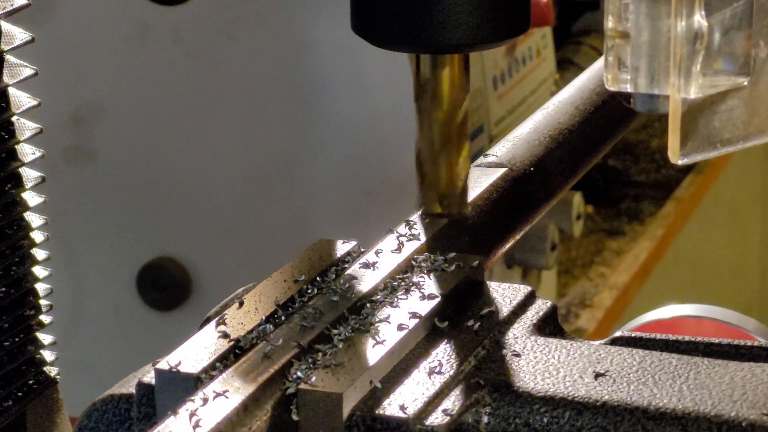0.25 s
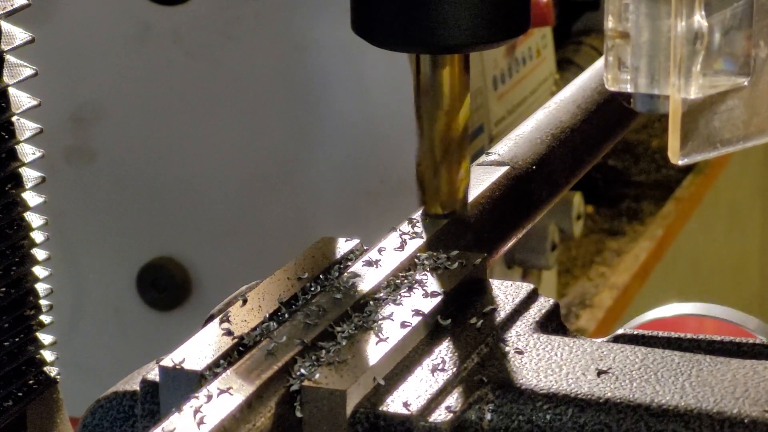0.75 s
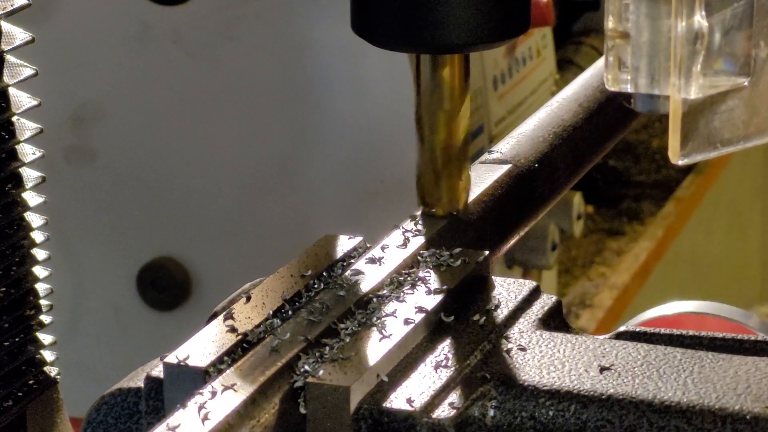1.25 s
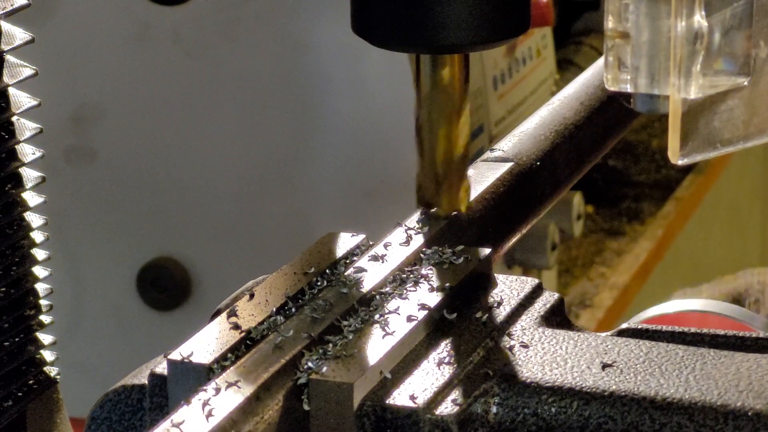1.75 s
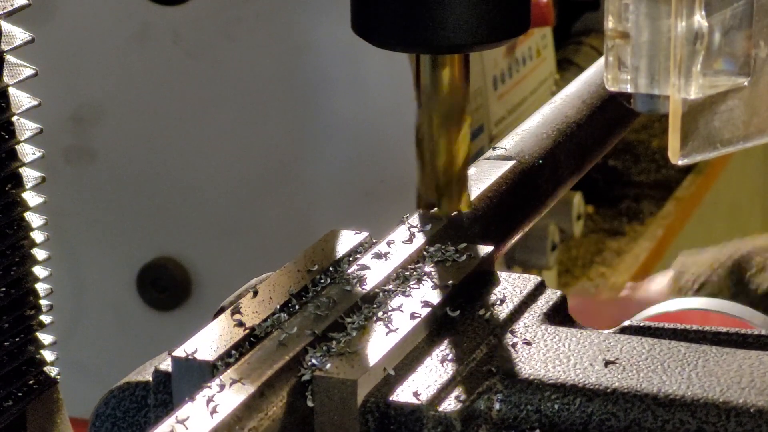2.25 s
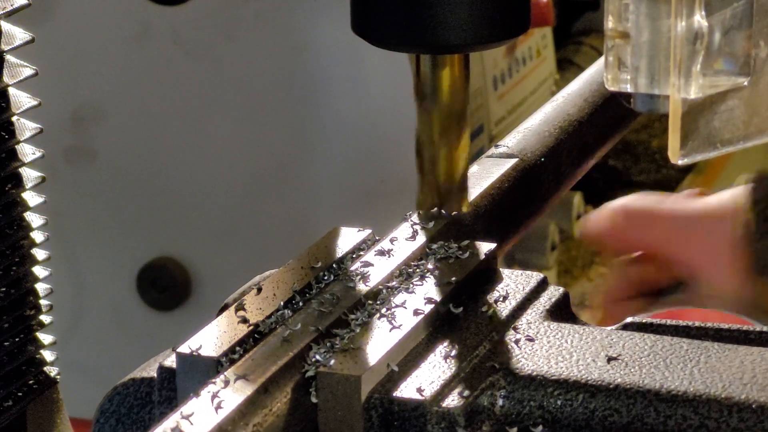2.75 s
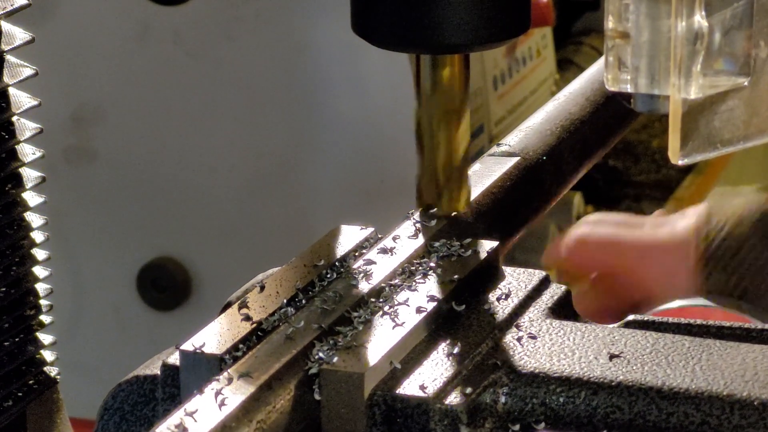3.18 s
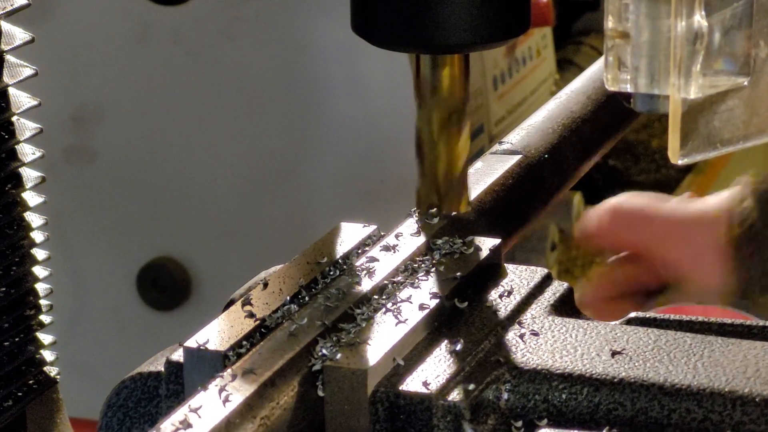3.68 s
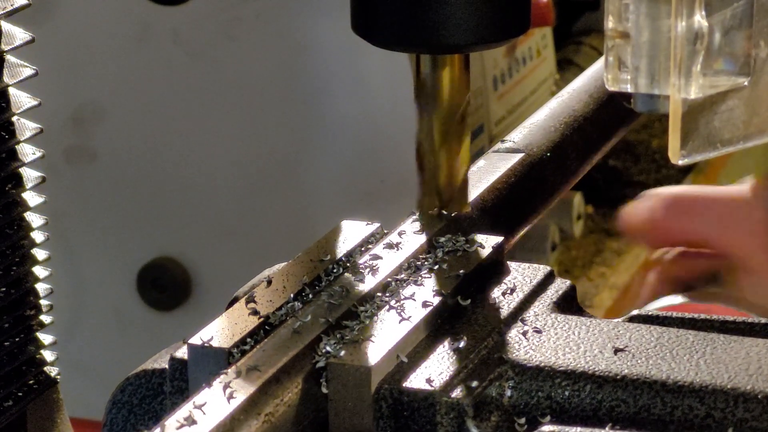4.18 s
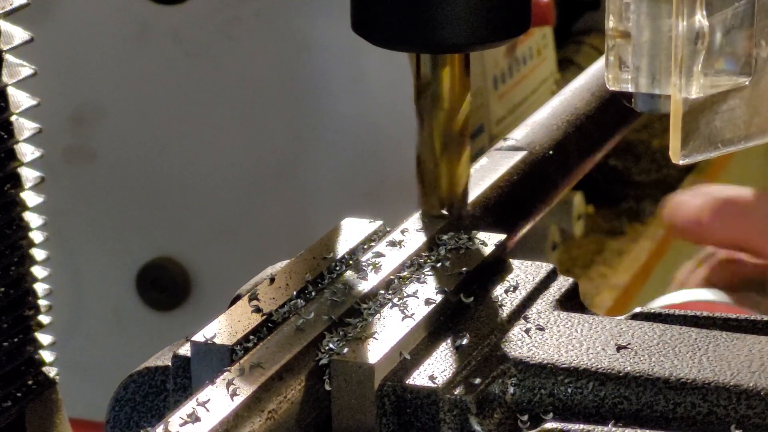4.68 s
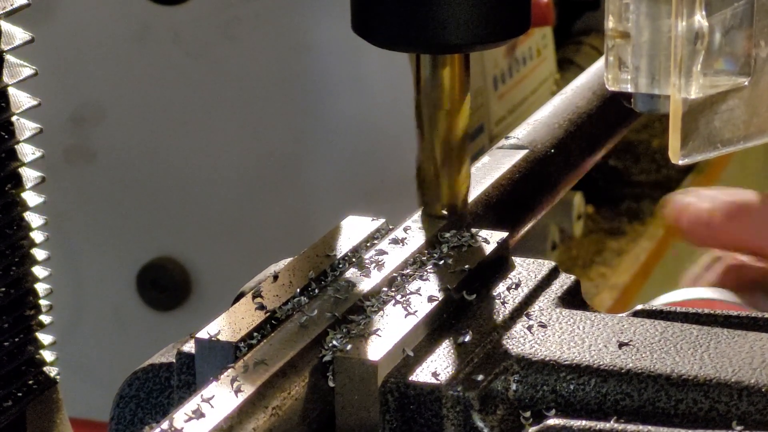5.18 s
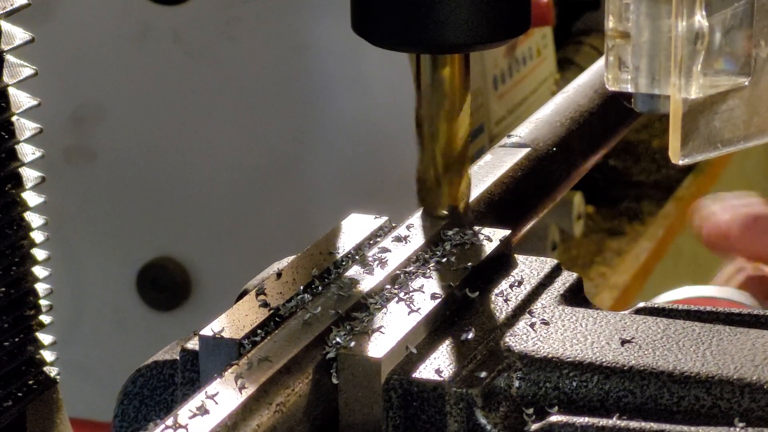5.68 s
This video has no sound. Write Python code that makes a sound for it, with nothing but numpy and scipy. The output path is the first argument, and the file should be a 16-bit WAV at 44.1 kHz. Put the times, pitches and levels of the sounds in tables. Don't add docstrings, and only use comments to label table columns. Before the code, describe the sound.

Milling machine hums and growls evenly while short irregular crackles, bright chirps and thin whistles snap off a steel bar close by.

```python
import sys
import numpy as np
from scipy import signal
from scipy.fft import rfft, irfft
from scipy.io import wavfile
from scipy.ndimage import uniform_filter1d

SR = 44100
rng = np.random.default_rng(int(sys.argv[2]) if len(sys.argv) > 2 else 0)


def master_out(mix):
    frames = np.transpose(np.atleast_2d(mix))
    ceiling = np.clip(frames, -1, 1)
    pcm = np.round(ceiling * 32767).astype(np.int16)
    wavfile.write(sys.argv[1], SR, pcm)


def volts_from_db(level):
    exponent = np.asarray(level, float) / 20
    return 10 ** exponent


N = 261513

# start in seconds, length in seconds, starting pitch in Hz,
# level in dB, left minus right in dB.
SQUEALS = [(0.29, 0.017, 4320, -17, 1), (0.307, 0.012, 4270, -18.5, 10), (0.325, 0.013, 4203, -11.5, -1),
           (0.789, 0.011, 4330, -11, -8), (0.801, 0.014, 4380, -13, 0), (0.812, 0.02, 4420, -13, 10),
           (0.836, 0.014, 4320, -21, -3), (0.861, 0.017, 4200, -10, 6), (1.236, 0.0098, 4520, -26, -1),
           (0.981, 0.0051, 4160, -18, 1), (1.246, 0.023, 4360, -12, -8), (1.271, 0.015, 4420, -13.5, 9),
           (1.675, 0.038, 4330, -14, -10), (1.716, 0.0085, 4370, -9, -4), (1.732, 0.0087, 4360, -11, 0),
           (1.748, 0.01, 4300, -20.5, 3), (2.025, 0.015, 3730, -26.5, 4), (2.038, 0.037, 4120, -32.5, -1),
           (2.233, 0.01, 3960, -16, 15), (2.352, 0.026, 4100, -28, 7), (2.455, 0.016, 3834, -20.5, 9),
           (3.024, 0.023, 4270, -10, 5), (3.055, 0.017, 4278, -14, -1), (3.07, 0.01, 4320, -11, 0),
           (3.087, 0.024, 4276, -15, 5), (3.472, 0.018, 4280, -23, 10), (3.355, 0.042, 4070, -31, -6),
           (3.504, 0.055, 4320, -13.5, -6), (3.941, 0.02, 4220, -17.5, 4), (4.403, 0.014, 4260, -9.5, 2.5),
           (4.5, 0.039, 3900, -30.5, 22), (4.55, 0.035, 4280, -23.5, -2), (4.75, 0.0086, 4090, -22, 0),
           (4.886, 0.011, 4213, -7, 4), (5.259, 0.013, 4080, -26.5, 4), (5.356, 0.01, 4240, -12, 3),
           (5.38, 0.022, 4260, -20, 12), (5.407, 0.045, 4380, -15, 4), (5.853, 0.036, 4216, -14, 6),
           (5.903, 0.03, 4370, -17.5, 2)]
# start in seconds, length in seconds, pitch in Hz, level in dB.
SQUEAKS = [(0.124, 0.018, 4760, -17.5), (0.327, 0.015, 3320, -25), (0.544, 0.03, 4030, -37),
           (0.628, 0.016, 5000, -24), (0.297, 0.02, 7650, -29), (0.3, 0.028, 5100, -33),
           (0.834, 0.022, 4150, -42), (0.86, 0.026, 3300, -25), (1.026, 0.016, 4046, -29.5),
           (1.489, 0.014, 4120, -27.5), (1.336, 0.0065, 3340, -38), (1.668, 0.0044, 4320, -24),
           (0.826, 0.024, 3510, -32), (2.024, 0.018, 5520, -22), (2.055, 0.025, 5710, -23),
           (2.227, 0.0087, 6220, -24.5), (2.38, 0.004, 4940, -22.5), (2.463, 0.0067, 5570, -13.5),
           (2.659, 0.007, 4020, -22.5), (2.663, 0.013, 3220, -23), (3.025, 0.039, 5320, -36),
           (3.096, 0.014, 3310, -26.5), (3.867, 0.0081, 5450, -28), (4.242, 0.016, 5000, -29),
           (4.256, 0.014, 5150, -32), (4.51, 0.032, 5600, -41), (4.507, 0.022, 3010, -26),
           (4.62, 0.0089, 5580, -22), (4.433, 0.0083, 4330, -24), (4.571, 0.005, 4300, -18),
           (4.895, 0.007, 4258, -16.5), (1.295, 0.017, 4370, -28), (3.959, 0.018, 4310, -28.5),
           (2.678, 0.034, 3210, -40), (5.245, 0.014, 4190, -35.5), (4.743, 0.011, 5010, -16.5),
           (4.888, 0.0089, 5050, -39), (5.231, 0.012, 5080, -29), (4.93, 0.05, 6340, -42),
           (5.753, 0.007, 3900, -38), (5.251, 0.011, 5070, -22), (3.566, 0.03, 4280, -27),
           (5.462, 0.02, 4310, -27), (5.755, 0.034, 5500, -28)]
# start in seconds, peak level in dB, pitch in Hz, length in seconds.
CHIRPS = [(0.045, -34, 4960, 0.01), (0.065, -39, 4000, 0.016), (0.38, -33, 5490, 0.03),
          (0.687, -36, 5780, 0.014), (0.885, -33, 5530, 0.02), (1.077, -34, 4970, 0.011),
          (1.089, -37, 5010, 0.012), (1.114, -29, 4870, 0.012), (0.141, -29, 4550, 0.017),
          (0.632, -33, 5300, 0.015), (0.083, -40, 5700, 0.006), (1.532, -38, 4930, 0.018),
          (0.113, -41, 7260, 0.008), (0.284, -30, 6250, 0.0079), (0.312, -21, 3830, 0.012),
          (0.768, -33, 5600, 0.015), (1.115, -41, 7230, 0.0071), (1.442, -41, 3030, 0.013),
          (1.497, -41, 6220, 0.01), (1.937, -42, 5010, 0.008), (2.6, -40, 4480, 0.021),
          (2.798, -39, 4940, 0.005), (2.9, -50, 6430, 0.006), (2.902, -43, 5000, 0.008),
          (2.92, -51, 5600, 0.014), (3.025, -31, 3350, 0.02), (3.358, -37, 5600, 0.02),
          (3.476, -33, 2350, 0.012), (3.478, -23, 4700, 0.01), (3.553, -27, 3310, 0.012),
          (3.55, -35, 3840, 0.012), (3.885, -39, 5500, 0.01), (4.269, -22, 5270, 0.01),
          (4.765, -26, 5590, 0.016), (5.365, -37, 2350, 0.02), (5.597, -40, 5800, 0.02),
          (5.862, -33, 6500, 0.03), (3.697, -45, 5840, 0.038), (4.1, -46, 5600, 0.012),
          (4.105, -32, 3120, 0.025), (3.852, -32, 3920, 0.037), (3.098, -22, 3900, 0.011),
          (4.662, -41, 4140, 0.024), (4.29, -29, 4150, 0.034), (4.313, -36, 4660, 0.006),
          (4.717, -23, 5020, 0.016), (5.595, -39, 2974, 0.027), (5.201, -27, 6320, 0.022),
          (4.284, -32, 5420, 0.02)]
# frequency in Hz, lead in radians.
PORT_LEAD = [(220, .1), (310, 1.1), (1120, 1.3), (1460, -.9), (2240, 1.5), (4050, .9), (4820, 2.7),
             (6290, 5.2), (7060, 7.0), (8800, 7.6), (12000, 7.1)]


def along_hz(table, hz):
    at, value = np.transpose(table)
    return np.interp(np.log(hz + 1), np.log(at + 1), value)


def level(x, db):
    return x * volts_from_db(db) / np.sqrt(np.mean(x ** 2))


def walk(rate, size=N):
    k = int(SR / rate)
    steps = np.repeat(rng.standard_normal(size // k + 1), k)
    return 1.25 * uniform_filter1d(uniform_filter1d(steps, k), k)[:size]


def bump(hz, centre, width):
    return 1 / np.sqrt(1 + (2 * (hz - centre) / width) ** 2)


def swell(length, rise, fall):
    t = np.arange(int((length + 7 * fall) * SR)) / SR
    grow = np.sin(np.pi / 2 * np.clip(t / rise, 0, 1)) ** 2
    return grow * np.exp(-np.clip(t - length, 0, None) / fall)


def add(out, s, sound):
    i = max(int(s * SR), 0)
    out[..., i:i + sound.shape[-1]] += sound[..., :out.shape[-1] - i]


def two_ports(spectrum_gain, source):
    # frequency in Hz, share that left and right have in common (0 to 1).
    alike = [(30, 0.72), (190, 1), (350, 0.81), (700, 0.7), (1400, 0.31), (3000, 0.29), (16000, 0.72)]
    hz = np.fft.rfftfreq(source.shape[1], 1 / SR)
    share = np.clip(along_hz(alike, hz), 0, 1)
    common, left, right = rfft(source) * spectrum_gain
    shared = np.sqrt(share) * common
    left = shared * np.exp(1j * along_hz(PORT_LEAD, hz)) + np.sqrt(1 - share) * left
    right = shared + np.sqrt(1 - share) * right
    return irfft([left, right], source.shape[1])


def machine_head():
    # frequency in Hz, level in dB per Hz.
    growl = [(15, -68), (25, -62), (92, -37), (215, -18.5), (252, -19), (284, -7), (332, -2), (366, -1.5),
             (717, -17.5), (761, -24.5), (1150, -11.5), (2800, -23.5)]
    hiss = [(3100, -34), (3700, -31), (5000, -35.5), (7000, -43), (10000, -49), (12800, -45.5),
            (16000, -47)]
    # frequency in Hz, width in Hz, height above the noise in dB.
    casing = [(59.2, 4, 11.5), (140.3, 9.2, 14), (221.5, 31, 7.5), (311.4, 17, 2.5), (330.4, 20, 6),
              (393, 18, 3.5), (415.3, 58, 6.5), (624.3, 30, 12.5), (715, 28.5, 17), (830, 40, 14),
              (947, 16, 9), (1155, 46, 10.5), (1529, 40, 5), (1700, 48, 8), (11190, 50, 10)]
    # time in seconds, growl level in dB, bench rumble in dB.
    load = [
        (0.0, -33.5, -62),
        (0.06, -34.5, -51),
        (1.0, -35, -55.5),
        (2.0, -34.5, -54),
        (2.5, -33, -57),
        (3.29, -34, -58.5),
        (3.75, -34, -54),
        (5.0, -33, -60.5),
        (5.93, -34, -58),
    ]
    # frequency in Hz, level in dB.
    hum_tones = [(100, -57.5), (300, -47.5), (618, -58), (1162, -57)]
    t, hz = np.arange(N) / SR, np.fft.rfftfreq(N, 1 / SR)
    s, load_db, rumble_db = np.transpose(load)
    peaks = sum((volts_from_db(db) - 1) * bump(hz, f, w) ** 2 for f, w, db in casing)
    gain = volts_from_db(along_hz(growl + hiss, hz)) * (1 + peaks)
    low = 1 / (1 + (hz / 90) ** 8)
    pulse = (1 + 0.18 * np.sin(2 * np.pi * hum_tones[0][0] * t)) * volts_from_db(0.9 * walk(12))
    mesh = two_ports(gain * (1 - low), pulse * rng.standard_normal((3, N)))
    rumble = two_ports(gain * low * np.clip(hz / 45, 0, 1) ** 2, rng.standard_normal((3, N)))
    hum = sum(volts_from_db(db + 5.6 + 1.7 * walk(4.2)) * np.sin(2 * np.pi * f * t) for f, db in hum_tones)
    mesh = volts_from_db(np.array([[1.1], [-1.1]])) * level(mesh, 2.31) * volts_from_db(np.interp(t, s, load_db))
    return mesh + level(rumble, 0) * volts_from_db(np.interp(t, s, rumble_db)) + hum


def slip_rate(s):
    tones = [(row[0], row[2]) for row in SQUEALS + SQUEAKS + CHIRPS if row[2] > 3700]
    return min(tones, key=lambda row: abs(row[0] - s))[1]


def causal(gain):
    cepstrum = irfft(np.log(gain + 1e-4))
    half = len(cepstrum) // 2
    cepstrum = np.concatenate([cepstrum[:1], 2 * cepstrum[1:half], np.zeros(half)])
    return np.exp(rfft(cepstrum))


def chip_ring(hz, slip_hz, bright_hz, low_db, chance):
    # frequency in Hz, width in Hz, level in dB.
    steel = [(3410, 180, -19), (4280, 35, 4), (5310, 3500, -12.5), (5600, 140, -21), (6930, 570, -27),
             (8640, 690, -22), (9400, 600, -9.5), (11220, 290, 3), (12400, 570, -6), (13200, 270, -11),
             (14300, 590, -10.5), (15200, 590, -4.5)]
    ring = sum(volts_from_db(db + 3 * a) * bump(hz, f * (1 + 0.006 * b), w) ** 2
               for (f, w, db), (a, b) in zip(steel, chance))
    ring = ring + volts_from_db(-26)
    ring = ring + volts_from_db(1.5) * bump(hz, slip_hz, 300) ** 2 + volts_from_db(3) * bump(hz, bright_hz, 450) ** 2
    ring = ring + sum(volts_from_db(-2) * bump(hz, k * slip_hz, 350) ** 2 for k in (2, 3))
    patches_db = 4.5 * walk(SR / 22, size=len(hz))
    scrape_db = low_db / (1 + (hz / 3900) ** 12)
    return ring * volts_from_db(patches_db + scrape_db) / np.sqrt(1 + (2500 / (hz + 1)) ** 6)


def tearing_chips():
    # start in seconds, length in seconds, level in dB, treble over middle in dB,
    # low scrape over middle in dB.
    bites = [(0.289, 0.043, -28, 2.5, -3), (0.33, 0.004, -28.5, -1, -6), (0.748, 0.02, -32, 0, 8),
             (0.768, 0.034, -25, 5, 5), (0.823, 0.024, -23.5, 0, 5), (1.25, 0.014, -30, 2, -10),
             (1.669, 0.059, -32, -2, -8), (1.703, 0.016, -28.5, 0, -4), (2.017, 0.046, -37.5, -5, -4),
             (2.23, 0.01, -41, 7, -2), (2.344, 0.037, -38.5, -9, -3), (2.369, 0.0056, -35.5, 0, -3),
             (2.434, 0.042, -31.5, -3, -7), (2.66, 0.012, -27.5, -3.5, 7), (3.019, 0.024, -32, 0, -5),
             (3.044, 0.034, -26.5, 9, -7), (3.088, 0.015, -35, -4, 0), (3.356, 0.014, -34, 0.5, -3),
             (3.372, 0.011, -33.5, -3, -3), (3.469, 0.036, -25.5, -3, -3), (3.549, 0.0068, -28, -6, -1),
             (3.842, 0.036, -33, -5.5, -4), (3.944, 0.013, -38, -4, -6), (4.1, 0.01, -31, -1, 1),
             (4.308, 0.0032, -30.5, -3, -15), (4.403, 0.016, -28.5, -2, -4), (4.509, 0.02, -27.5, -2, 4),
             (4.533, 0.024, -26, -8, 0), (4.742, 0.017, -30, -4, -7), (4.883, 0.018, -28, 3, -7),
             (5.236, 0.03, -30, -6, -5), (5.356, 0.038, -22.5, -8.5, -2), (5.408, 0.026, -25.5, 0, -5),
             (5.85, 0.08, -36.5, 2, -8)]
    # start in seconds, level in dB, treble over middle in dB,
    # brightest treble in Hz.
    grazes = [(0.044, -41, -12, 10500), (0.081, -44.5, -6, 12100), (0.12, -37, -15, 9400),
              (0.276, -49, -1, 12800), (0.624, -39.5, -5, 14800), (1.028, -47, -12, 7940),
              (1.107, -43, -15, 12300), (1.233, -46, -9, 13200), (1.484, -43.5, -14, 12800),
              (1.527, -40, -13, 12600), (4.714, -41, -3, 11200), (2.772, -45.5, -18, 12500),
              (2.796, -50, -12, 10500), (2.897, -53, -6, 10940), (0.55, -46, -7, 12600),
              (4.262, -43, 0, 14900), (4.663, -36, -9, 12100), (5.195, -49, -17, 12500),
              (5.597, -41, 1, 13900), (5.754, -38, 2, 12400)]
    chips = [(*bite, 12500) for bite in bites]
    chips += [(s, 0.0087, db, treble_db, -2, bright_hz) for s, db, treble_db, bright_hz in grazes]
    chances = rng.standard_normal((len(chips), 12, 2))
    size = 8192
    hz = np.fft.rfftfreq(size, 1 / SR)
    treble = 1 / (1 + (6800 / (hz + 1)) ** 10)
    out = np.zeros((2, N))
    for (s, length, db, treble_db, low_db, bright_hz), chance in zip(chips, chances):
        ring = chip_ring(hz, slip_rate(s), bright_hz, low_db, chance)
        middle, high = (causal(g) / np.sqrt(np.mean(g ** 2)) for g in (ring * (1 - treble), ring * treble))
        sound = 0
        for gain, share_db in ((middle, treble_db), (high, -treble_db)):
            drive = np.zeros(size)
            shape = swell(length + 0.0041, min(0.011, 0.56 * length), 0.013)
            add(drive, 0.005, volts_from_db(db + 1.5) * shape)
            slips = rng.standard_normal((3, size)) * volts_from_db(2.7 * walk(217, size=size))
            sound = sound + two_ports(gain / np.sqrt(1 + volts_from_db(2 * share_db)), slips * drive)
        add(out, s - 0.008, sound)
    return out * volts_from_db(np.array([[1.2], [-1.2]]))


def chatter(rows, trim_db, overtones_db, fall, wobble_db):
    locking_hz = [4300, 5060, 5720, 6500, 8640, 11170, 13300]
    out = np.zeros((2, N))
    wobble, waver, flutter = walk(110), walk(100), walk(900)
    for s, length, start_hz, end_hz, db, pan_db in rows:
        shape = swell(length + 0.0009, 0.01, fall)
        t = np.arange(len(shape)) / SR
        i = np.clip(int(s * SR) + np.arange(len(shape)), 0, N - 1)
        loose = np.clip(np.min(np.abs(end_hz / np.array(locking_hz) - 1)) / 0.1, 0.1, 1)
        hz = start_hz + (end_hz - start_hz) * np.clip(2 * t / length - 0.5, -0.5, 1.5)
        hz = hz * (1 + 0.0031 * waver[i]) - 40 * np.exp(-t / 0.0058)
        phase = 2 * np.pi * np.cumsum(hz + 150 * loose * flutter[i]) / SR
        shape = shape * volts_from_db(wobble_db * wobble[i] - 0.69 * loose)
        pan = volts_from_db(np.array([[pan_db], [-pan_db]]) / 2)
        heard_db = overtones_db if end_hz > 3900 else overtones_db[:1]
        for k, over_db in enumerate(heard_db, start=1):
            if k * end_hz < 0.36 * SR:
                lead = np.array([[along_hz(PORT_LEAD, k * end_hz)], [0]])
                sides = np.sin(k * phase + lead) * pan
                gain = volts_from_db(db + trim_db + over_db - abs(pan_db) / 4)
                add(out, s - 0.005, gain * shape ** (1 + (k > 1)) * sides)
    return out


def faint_chirps():
    rows = [(s, length, hz, hz, db, 2.5) for s, db, hz, length in CHIRPS]
    return chatter(rows, trim_db=-3, overtones_db=[0, -25, -22], fall=0.0086, wobble_db=2)


def thin_whistles():
    # start in seconds, length in seconds, pitch in Hz, level in dB.
    high_modes = [(0.775, 0.04, 12450, -19), (0.776, 0.006, 14260, -27), (0.803, 0.02, 13250, -11.5),
                  (1.242, 0.0084, 8630, -22), (1.245, 0.01, 12500, -17), (1.264, 0.008, 13370, -6.5),
                  (1.492, 0.0076, 12400, -16.5), (1.671, 0.04, 8600, -23), (2.227, 0.014, 12320, -17),
                  (2.663, 0.012, 12450, -16), (3.033, 0.016, 15400, -25), (3.057, 0.014, 13160, -15),
                  (3.48, 0.016, 14300, -21), (3.535, 0.02, 12250, -20), (3.532, 0.023, 12900, -12),
                  (4.309, 0.0066, 12300, -19), (4.312, 0.0064, 9360, -15), (4.404, 0.024, 8600, -26),
                  (4.511, 0.0088, 12560, -10.5), (4.73, 0.023, 10000, -26), (4.739, 0.0094, 15200, -10.5),
                  (5.204, 0.006, 12400, -13.5), (5.234, 0.014, 15230, -28), (5.4, 0.045, 12900, -16.5),
                  (5.862, 0.01, 12300, -31), (5.87, 0.073, 8700, -30), (5.885, 0.03, 13100, -18),
                  (5.921, 0.012, 13040, -12), (0.125, 0.015, 14800, -34), (0.122, 0.03, 9400, -35),
                  (0.29, 0.025, 8500, -31), (0.3, 0.028, 12300, -14), (0.295, 0.02, 13000, -22),
                  (0.305, 0.015, 15000, -26), (0.976, 0.012, 12400, -34), (1.036, 0.011, 7960, -30),
                  (1.027, 0.011, 12400, -38), (1.114, 0.013, 12070, -27), (1.115, 0.017, 14400, -38),
                  (1.116, 0.011, 9400, -33.5), (1.497, 0.0088, 8100, -30), (1.69, 0.03, 12900, -19),
                  (3.361, 0.02, 12340, -25.5), (3.515, 0.03, 8640, -26), (4.103, 0.015, 14200, -26),
                  (4.246, 0.039, 10200, -37), (5.365, 0.03, 14300, -22), (5.437, 0.014, 7770, -31),
                  (5.757, 0.006, 12200, -28), (5.76, 0.039, 11000, -35)]
    # start in seconds, length in seconds, pitch in Hz,
    # level in dB.
    pings = [
        (0.553, 0.014, 8050, -36),
        (3.372, 0.026, 9400, -30),
        (3.862, 0.022, 9400, -33),
        (4.103, 0.02, 8600, -33),
        (5.6, 0.016, 9000, -39),
        (3.035, 0.03, 9400, -31),
        (2.02, 0.025, 9300, -37),
        (5.405, 0.02, 7750, -31),
    ]
    # start in seconds, length in seconds, level in dB.
    rings = [(0.3, 0.025, -16), (0.768, 0.024, -26), (0.829, 0.018, -10), (1.254, 0.022, -20),
             (1.673, 0.045, -23), (2.061, 0.04, -32), (2.374, 0.013, -28.5), (2.459, 0.024, -26),
             (2.661, 0.011, -25), (3.024, 0.034, -17), (3.094, 0.013, -20.5), (3.473, 0.033, -19),
             (3.53, 0.035, -24), (3.842, 0.052, -29), (4.104, 0.014, -19.5), (4.412, 0.022, -13.5),
             (4.517, 0.0099, -19), (4.537, 0.01, -18), (5.36, 0.02, -15), (5.403, 0.0081, -12),
             (5.853, 0.075, -21.5)]
    bar_hz = 11176
    rows = [(s, length, hz, hz, db, 6) for s, length, hz, db in high_modes + pings]
    rows += [(s, length, bar_hz, bar_hz, db, 4) for s, length, db in rings]
    return chatter(rows, trim_db=-6, overtones_db=[0], fall=0.0025, wobble_db=-0.5)


def squeals_and_squeaks():
    # frequency in Hz, left minus right in dB.
    squeak_pan = [(3000, 25), (4080, 21), (4800, -6.5), (5080, 23.5), (5600, 2.5), (6400, 10)]
    settle_hz, pull, most_slide_hz = 4299, 0.32, 88
    rows = []
    for s, length, hz, db, pan_db in SQUEALS:
        slide_hz = np.clip(pull * (settle_hz - hz), -most_slide_hz, most_slide_hz)
        rows.append((s, length, hz, hz + slide_hz, db, pan_db - 2.5))
    for s, length, hz, db in SQUEAKS:
        rows.append((s, length, hz, hz * 1.011, db, along_hz(squeak_pan, hz)))
    return chatter(rows, trim_db=-1, overtones_db=[0, -22, -18], fall=0.0052, wobble_db=1.5)


def room(x):
    t60_s, treble_t60_s, tail_db = 0.27, 0.22, -7.5
    t = np.arange(int(0.7 * SR)) / SR
    noise = rng.standard_normal((2, len(t)))
    dull = signal.sosfilt(signal.butter(2, 7000, fs=SR, output="sos"), noise)
    fade = np.exp(-np.log(1000) * t / t60_s)
    treble_fade = np.exp(-np.log(1000) * t / treble_t60_s)
    tail = (dull * fade + (noise - dull) * treble_fade) * np.clip(t / 0.00084, 0, 1)
    tail = tail * volts_from_db(tail_db) / np.sqrt(np.sum(tail ** 2, axis=1, keepdims=True))
    return signal.fftconvolve(x[:1], tail, axes=1)[:, :N]


def scene():
    cut = tearing_chips() + faint_chirps() + thin_whistles() + squeals_and_squeaks()
    return machine_head() + cut + room(cut)


def roll_off(x):
    return signal.sosfilt(signal.butter(12, 15950, fs=SR, output="sos"), x)


def record(dry):
    top_cut = signal.ellip(6, 0.5, 50, 15300, fs=SR, output="sos")
    return roll_off(signal.sosfilt(top_cut, dry))


dry = scene()
out = record(dry)
master_out(out)
```